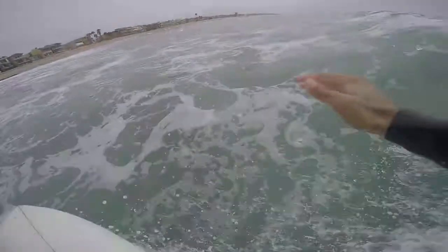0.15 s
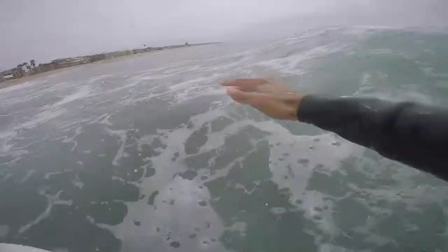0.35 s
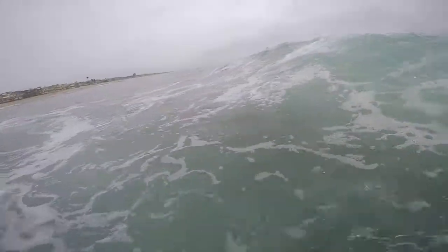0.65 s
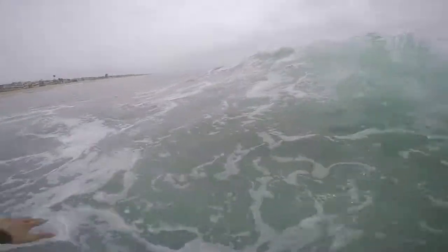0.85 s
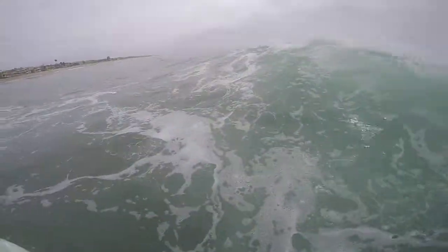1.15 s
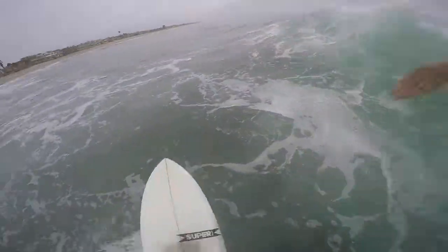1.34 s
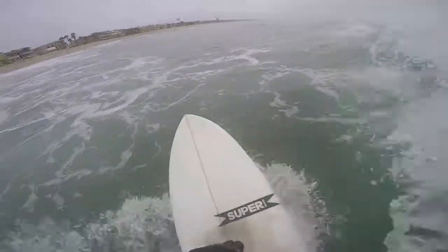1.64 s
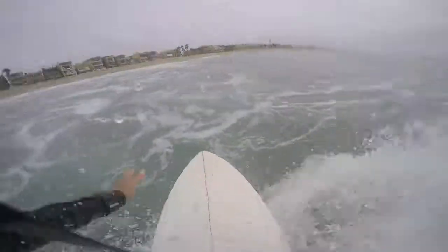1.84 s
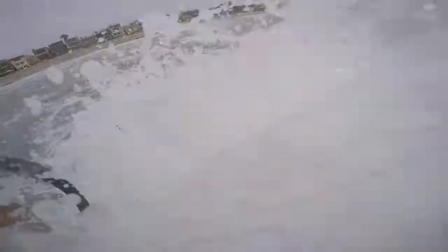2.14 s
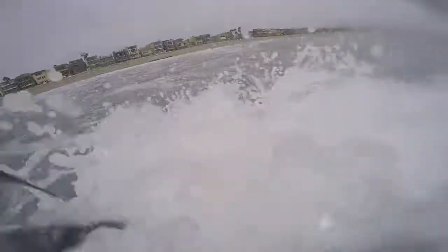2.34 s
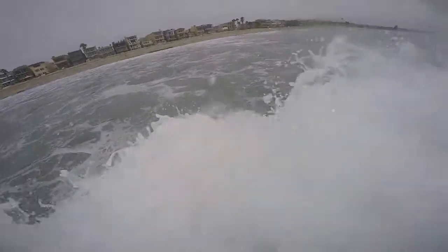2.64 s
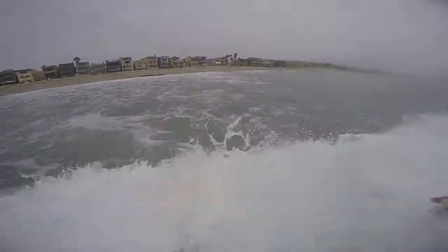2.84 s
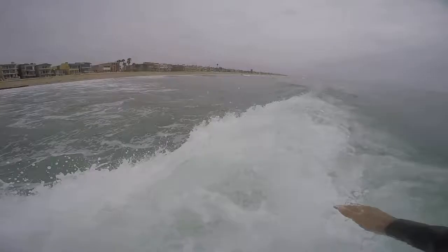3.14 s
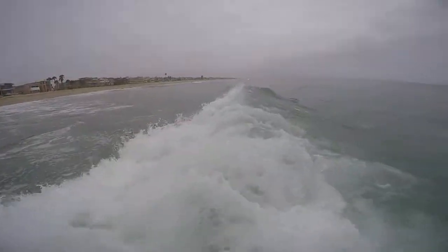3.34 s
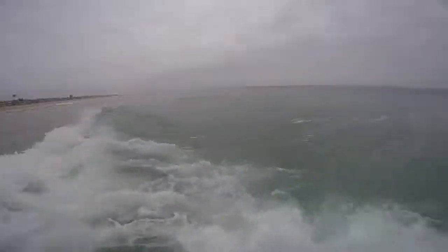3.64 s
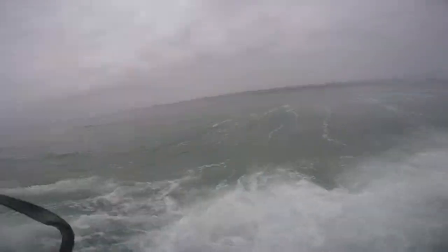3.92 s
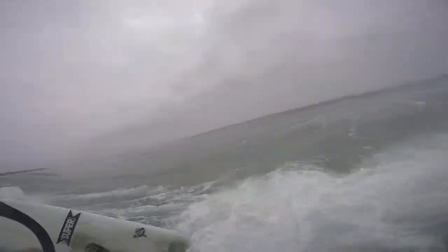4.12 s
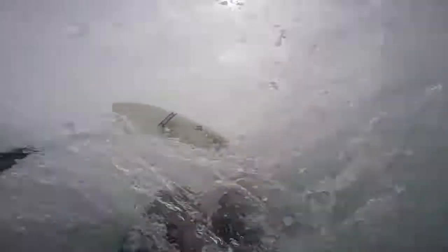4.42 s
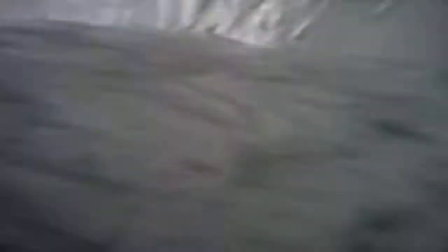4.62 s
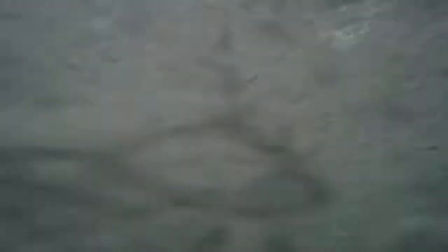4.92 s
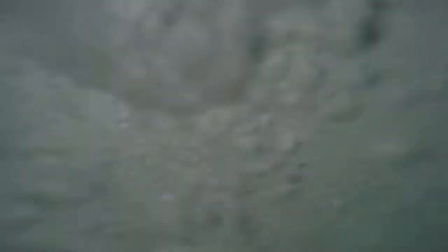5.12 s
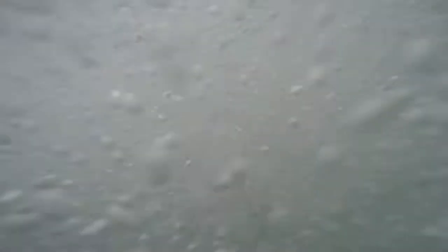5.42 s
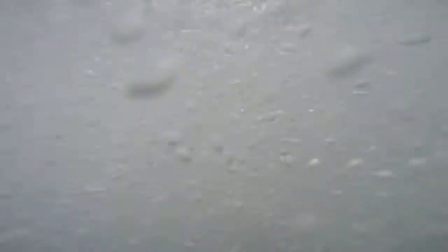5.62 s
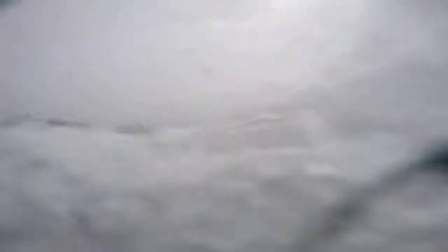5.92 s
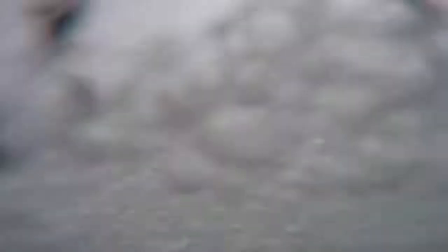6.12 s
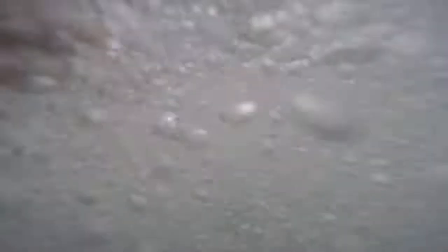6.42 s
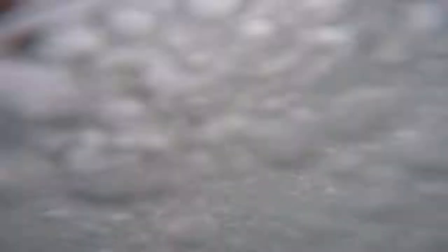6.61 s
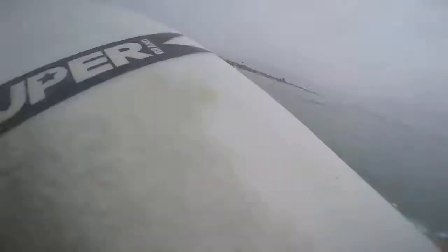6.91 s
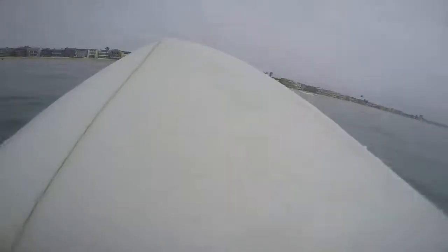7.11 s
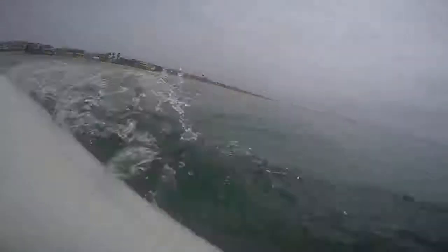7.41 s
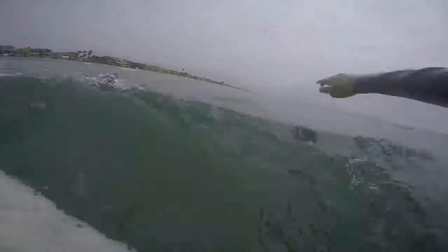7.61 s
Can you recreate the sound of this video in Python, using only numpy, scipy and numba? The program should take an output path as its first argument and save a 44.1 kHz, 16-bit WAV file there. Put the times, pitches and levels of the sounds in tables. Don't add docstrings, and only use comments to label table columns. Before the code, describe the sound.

A small enclosed microphone rides a breaking wave, gets slapped and dunked, gurgles through bubbles, pops back up with sharp knocks and trickling water.

```python
import sys
import numpy as np
from scipy import signal
from scipy.fft import rfft, irfft, next_fast_len
from scipy.io import wavfile
from scipy.ndimage import uniform_filter1d
from numba import njit

SR = 44100
rng = np.random.default_rng(int(sys.argv[2]) if len(sys.argv) > 2 else 0)


def natural_amplitude(level_db):
    exponent = np.asarray(level_db, float) / 20
    return 10 ** exponent


def unload_wav(signal):
    wavfile.write(
        sys.argv[1],
        SR,
        np.round(np.clip(np.atleast_2d(signal).T, -1, 1) * 32767).astype(np.int16),
    )


N = 342216


def unit(x):
    return x / np.sqrt(np.mean(x ** 2))


def colour(x, points):
    hz, db = np.transpose(points)
    size = next_fast_len(N)
    f = np.arange(size // 2 + 1) * SR / size + 1
    gain = natural_amplitude(np.interp(np.log(f), np.log(hz), db))
    return unit(irfft(rfft(x, size) * gain, size)[:N])


def resonate(x, hz, width):
    b, a = signal.iirpeak(min(hz, .45 * SR), hz / width, fs=SR)
    return signal.lfilter(b, a, x)


def walk(rate):
    hold = int(SR / rate)
    steps = np.repeat(rng.standard_normal(1000), hold)[:N]
    slewed = uniform_filter1d(uniform_filter1d(steps, hold), hold)
    return np.clip(1.3 * slewed, -2, 2)


def bell(t, s, width):
    return np.exp(-((t - s) / width) ** 2)


def add(out, at_s, sound):
    i = int(at_s * SR)
    out[i:i + len(sound)] += sound[:N - i]


@njit
def ring(start, hz, cycles, size, glide, count):
    out = np.zeros(count)
    for k in range(len(start)):
        length = cycles * SR / hz[k]
        phase = 0.
        for i in range(min(int(5 * length), count - start[k])):
            phase += 2 * np.pi * hz[k] / SR * (1 + glide * i / length)
            swell = 1 - np.exp(-phase / 4)
            out[start[k] + i] += size[k] * swell * np.exp(-i / length) * np.sin(phase)
    return out


def bubbles(count, usual_hz, octaves, cycles, glide, scatter_db):
    when, big, low, high = rng.random((count, 4)).T
    start = (when * N).astype(np.int64)
    hz = (usual_hz * np.ones(N))[start] * 2 ** (octaves * (low + high - 1))
    size = natural_amplitude(-scatter_db * np.log(1 - .98 * big))
    shower = ring(start, hz, float(cycles), size, float(glide), N)
    return shower / np.sqrt(uniform_filter1d(shower ** 2, size=11000) + 1e-9)


# (time [s], step [full scale], negative = sucked out)
FILM_FLIPS = [
    (1.468, .3),
    (1.498, -.4),
    (2.21, .35),
    (4.369, -.35),
    (6.834, -.45),
    (6.8515, .6),
    (4.66, -.25),
]
FLIP_S, SETTLE_S = .0025, .014


def flips(t):
    return sum(step * np.tanh((t - s) / FLIP_S) * bell(t, s, SETTLE_S) for s, step in FILM_FLIPS)


# (frequency [Hz], level per Hz [dB])
HEAVE_COLOUR = [(1.5, -19), (4, 12), (8, -6), (15, 6.5), (28, 5), (45, -11.5), (70, -20), (120, -77)]
# (time [s], level [dB])
SWELL_LEVEL = [(0.0, -32), (.7, -15.5), (1.15, -13), (1.3, -27), (2.0, -19), (2.35, -39.5), (3.33, -17),
               (3.7, -29), (4.2, -26.5), (4.55, -21), (4.84, -33.5), (5.32, -25), (5.88, -37.5),
               (6.42, -21), (6.8, -25.5), (7.3, -17), (7.76, -14.5)]
# (peak time [s], half width [s], level [dB])
HOUSING_JOLTS = [(0.05, 0.036, -30), (.24, 0.03, -26), (1.16, 0.027, -19), (1.48, 0.098, -21),
                 (1.69, 0.023, -21), (2.1, 0.068, -17.5), (2.214, 0.051, -13), (2.451, 0.037, -16.5),
                 (2.63, 0.099, -22), (2.811, 0.033, -21.5), (4.34, 0.051, -4.5), (4.47, 0.04, -15),
                 (4.7, 0.029, -15), (6.548, 0.028, -8), (6.847, 0.025, -6.5), (6.95, 0.055, -11.5),
                 (7.13, 0.12, -15), (7.52, 0.054, -21), (7.71, 0.022, -15)]
JOLT_HZ, JOLT_KNOCK_DB = 44.8, -11.5
OPENING_PUSH, OPENING_S = 0.15, 0.014


def heave(t):
    swing = colour(rng.standard_normal(N), HEAVE_COLOUR)
    power = uniform_filter1d(uniform_filter1d(swing ** 2, size=5000), size=5000)
    swing = swing / np.sqrt(power + .05)
    knock = unit(resonate(resonate(rng.standard_normal(N), JOLT_HZ, 36), JOLT_HZ, 36))
    jolts = sum(natural_amplitude(db) * bell(t, s, width) for s, width, db in HOUSING_JOLTS)
    swell = natural_amplitude(np.interp(t, *np.transpose(SWELL_LEVEL)))
    push = (swell + jolts) * swing + natural_amplitude(JOLT_KNOCK_DB) * jolts * knock
    push = push + OPENING_PUSH * bell(t, 0, OPENING_S) + flips(t)
    return .95 * np.tanh(push / .95)


# (start time [s], gap [s], level [dB], crack level [dB])
WHITE_WATER = [
    (2.065, 0.0018, -15, -22),
    (2.193, 0.0028, -18.5, -27),
    (4.652, .006, -11.5, -38),
]
LUMP_HZ, LUMP_OCTAVES, LUMP_SCATTER_DB = 1700, 0.76, -0.5


def lumps():
    rows = []
    for start, gap, db, crack_db in WHITE_WATER:
        scatter = np.clip(rng.standard_normal((12, 3)), -2, 2)
        for k, (late, size, tone) in enumerate(scatter):
            s = start + gap * (k + 0.33 * late)
            lift_db = LUMP_SCATTER_DB * size
            hz = LUMP_HZ * 2 ** (LUMP_OCTAVES * tone)
            rows.append((s, db + lift_db, hz, crack_db + lift_db))
    return rows


# (time [s], peak level [dB], ring [Hz], crack level [dB])
RIDING_BLOWS = [(0.447, -24, 1500, -50), (1.431, -10.5, 1170, -40), (1.4435, -17, 1230, -40),
                (1.4642, -6, 1210, -38), (1.803, -3.5, 1910, -18), (1.864, -9, 680, -31),
                (1.982, -2.5, 2860, -11.5), (2.001, -13, 1040, -22), (2.052, -18, 1760, -30),
                (2.066, -1.5, 3800, -6.5), (2.088, -8, 1760, -12), (2.091, 4, 2770, -6),
                (2.11, 4, 1760, -15), (2.132, -1.5, 2900, -10), (2.198, -2, 2510, -9),
                (2.209, -12.5, 870, -6.5), (2.217, -28, 647, -39), (2.23, -23, 1480, -40),
                (2.195, -3, 1810, -7), (2.305, -16, 2800, -51), (2.519, -9, 1990, -40),
                (2.595, -5, 2140, -41), (2.626, -20, 1700, -36), (2.639, -10, 2170, -40),
                (2.767, -15.5, 2120, -44), (2.799, -3.5, 1950, -39), (2.8005, -4, 1110, -41),
                (2.81, -7, 1240, -41), (2.881, -26, 1664, -28)]
# (time [s], peak level [dB], ring [Hz], crack level [dB])
TUMBLING_BLOWS = [(4.334, 10.5, 1207, -13), (4.373, -4, 1940, -36), (4.378, 1, 1980, -37),
                  (4.425, -6, 1790, -48), (4.437, -15.5, 1060, -49), (4.509, -17, 756, -58),
                  (4.523, -17, 1800, -56), (4.629, -16, 1730, -13), (4.641, -11, 1210, -31),
                  (4.658, -2, 1460, -30), (4.722, 3.5, 2070, -7), (4.797, -14, 2080, -25),
                  (4.876, -16, 1330, -50), (4.959, -12, 1290, -51), (5.184, -20, 2070, -55),
                  (5.323, -40, 2380, -64), (5.374, -13.5, 700, -57), (5.404, -13.5, 735, -62),
                  (5.47, -9.5, 527, -62), (5.538, -17.5, 830, -62), (5.565, -18, 1330, -62),
                  (5.682, -20.5, 3550, -55), (5.698, -11, 1420, -58), (5.727, -17, 1810, -51),
                  (5.802, -24, 1960, -46), (5.866, -14.5, 338, -62), (5.921, -27, 1000, -41),
                  (6.04, -22.5, 3500, -46)]
# (time [s], peak level [dB], ring [Hz], crack level [dB])
SURFACING_BLOWS = [(6.472, -11.5, 920, -26), (6.521, 4, 1855, -11), (6.5225, -11, 706, -40),
                   (6.527, -17, 2190, -42), (6.63, -16.5, 1970, -51), (6.649, -15.5, 890, -51),
                   (6.833, -1, 2250, -2.5), (6.846, 1, 930, -26), (6.8493, 0.5, 2830, -6),
                   (6.8535, -11, 980, -9), (6.914, -10, 596, -24), (6.945, -16.5, 830, -49),
                   (6.953, -14, 810, -40), (7.038, 4.5, 1600, -37), (7.0395, 0.5, 720, -45),
                   (7.199, -29, 940, -42), (7.32, -15, 2200, -48), (7.385, -18, 664, -47),
                   (7.414, -24, 713, -48), (7.437, -22, 850, -50), (7.471, -1, 1146, -51),
                   (7.566, -13.5, 1200, -54), (7.611, -22, 865, -26), (7.631, -14.5, 1070, -44),
                   (7.72, -18, 1100, -38)]
SLAP_MS, SLAP_SCATTER = 2.83, 0.26


def slaps():
    out, t = np.zeros(N), np.arange(int(.06 * SR)) / SR
    high = signal.butter(2, [3800, 13500], "band", fs=SR, output="sos")
    for s, db, hz, crack_db in list(RIDING_BLOWS) + list(TUMBLING_BLOWS) + list(SURFACING_BLOWS) + lumps():
        ms = SLAP_MS * 2 ** (SLAP_SCATTER * (2 * rng.random() - 1))
        shake, spit, drift = rng.standard_normal((3, len(t)))
        u = t / (np.clip(ms, .8, 12) / 3000)
        push = u ** 1.01 * np.exp(1 - u) / 2
        run_off = 0.064 * (1 - np.exp(-u)) * np.exp(-t / 0.0066)
        mode = np.sqrt(2) * np.sin(2 * np.pi * hz * t + 0.052 * np.cumsum(drift))
        neighbours = signal.butter(3, [0.37 * hz, min(1.75 * hz, 4400)], "band", fs=SR, output="sos")
        rattle = unit(signal.sosfilt(neighbours, shake))
        blow = natural_amplitude(db + 1.63) * (0.66 * push * mode + 0.46 * (push + 1.1 * run_off) * rattle)
        crack = natural_amplitude(crack_db + 2) * push ** 1.5 * signal.sosfilt(high, spit)
        thud = natural_amplitude(min(db, 0) - 18.0) * np.exp(-t / 0.0018) * np.sin(2 * np.pi * 300 * t)
        add(out, s - .0004, blow + crack + thud)
    return out


# (peak time [s], rise [s], fall [s], level [dB],
# brightness [dB], which lifts spray and lowers slosh)
THROWN_WATER = [(.45, 0.22, 0.16, -48.5, -4), (1.47, 0.21, 0.044, -40.5, 2.5),
                (1.76, 0.17, 0.06, -54.5, 25.5), (1.9, 0.12, 0.098, -28.5, 3.5),
                (2.1, 0.071, 0.093, -28, -1), (2.206, 0.0062, 0.014, -15.5, -0.5),
                (2.81, 0.046, 0.022, -47, -6), (3.35, 0.022, 0.062, -47, -3),
                (4.17, 0.038, 0.084, -40.5, 5), (4.31, 0.034, 0.042, -36.5, 5),
                (4.669, 0.028, 0.062, -14.5, 0), (5.47, 0.026, 0.053, -69, -18),
                (6.525, 0.025, 0.016, -32.5, -7), (6.855, 0.0026, 0.0065, -31.5, -21),
                (7.22, 0.032, 0.11, -65.5, -22), (7.4, 0.016, 0.027, -40.5, -8),
                (7.76, 0.028, .03, -59, -18)]


def surges(t, lean):
    gain = 0
    for s, rise, fall, db, bright_db in THROWN_WATER:
        gain = gain + natural_amplitude(db + lean * bright_db) * bell(t, s, np.where(t < s, rise, fall))
    return gain


# (frequency [Hz], width [Hz], level [dB])
HOUSING_MODES = [(780, 133, 2), (1760, 70, 11), (2685, 140, 5), (3994, 157, 3.5), (2340, 180, 1.5)]
FLICKER_DB = 2


def wash(share, bubble_hz, depth):
    t = np.arange(N) / SR
    foam = rng.standard_normal(N)
    hiss = np.zeros(N)
    for k, (hz, width, db) in enumerate(HOUSING_MODES):
        flicker = natural_amplitude(db + FLICKER_DB * walk(13))
        hiss += (-1) ** k * flicker * resonate(foam, hz, 2.0 * width)
    hiss = signal.sosfilt(signal.butter(4, 4600, fs=SR, output="sos"), hiss)
    stilled = depth * (np.abs(t - 6.2) > .6)
    hiss = hiss - .8 * stilled * resonate(hiss, 3920, 900)
    plops = bubbles(count=7000, usual_hz=bubble_hz, octaves=1.2, cycles=1.86, glide=.03, scatter_db=3.5)
    blips = bubbles(count=9000, usual_hz=1800, octaves=1.1, cycles=4.0, glide=0.05, scatter_db=6.5)
    swarm = unit(natural_amplitude(3.5 * walk(55)) * (plops + 1.37 * depth * blips))
    water = (1 - share) * unit(hiss) + np.sqrt(share * (2 - share)) * swarm
    return water - .9 * (1 - share) ** 2 * resonate(water, 1250, 500)


# (frequency [Hz], level per Hz [dB])
SLOSH_COLOUR = [(50, 3.5), (70, 8.5), (140, -7.5), (300, -5), (600, -8.5), (1000, -50)]


def slosh(share):
    rumble = natural_amplitude(4.5 * walk(25)) * colour(rng.standard_normal(N), SLOSH_COLOUR)
    glugs = bubbles(count=1200, usual_hz=188.7, octaves=1.6, cycles=2.22, glide=0.081, scatter_db=2.0)
    return np.sqrt(1 - share) * unit(rumble) + np.sqrt(share) * glugs


# (frequency [Hz], level per Hz [dB])
SPRAY_COLOUR = [(2590, -10.5), (4350, 0), (5100, 2), (6600, -4.5), (8000, -4.5), (9800, -10.5),
                (14600, -14), (15500, -18)]
CRACKLE = 1.7


def spray(share):
    fizz = natural_amplitude(1.8 * walk(14)) * rng.standard_normal(N)
    crackle = bubbles(count=2000, usual_hz=7500, octaves=0.97, cycles=3.5, glide=0, scatter_db=4.0)
    far = (1 - share) ** 1.98 * colour(fizz, SPRAY_COLOUR)
    near = share ** 2 * colour(crackle, [(3000, -6.0), (4500, 13.0), (15000, -13.0)])
    return far + CRACKLE * near


# (middle time [s], half width [s], bubble [Hz], level [dB])
BUBBLE_TRAINS = [(4.37, 0.021, 2030, -30.5), (2.213, 0.011, 154, -18), (6.526, 0.0026, 191, -5.5),
                 (5.101, 0.075, 201, -36.5), (5.24, 0.061, 154, -34), (5.42, 0.096, 684, -34.5),
                 (5.57, 0.058, 754, -41), (5.989, 0.052, 109, -36), (6.2, 0.14, 650, -44.5),
                 (6.44, 0.026, 695, -36), (6.56, 0.01, 676, -33), (7.18, 0.074, 984, -31),
                 (7.29, 0.064, 890, -40), (7.42, 0.024, 815, -34), (7.61, .05, 1040, -47)]


def gurgles(t):
    gains = np.array([natural_amplitude(db) * bell(t, s, width) for s, width, _, db in BUBBLE_TRAINS])
    hz = np.array(BUBBLE_TRAINS)[gains.argmax(axis=0), 2]
    stream = bubbles(count=6000, usual_hz=hz, octaves=0.53, cycles=2.2, glide=0.017, scatter_db=6.5)
    return gains.sum(axis=0) * stream


# (time [s], peak level [dB], pitch [Hz])
SHELL_DROPLETS = [(1.662, -24.5, 1830), (1.703, -20.5, 3740), (1.733, -24, 3960), (1.767, -26, 1900),
                  (1.826, -17, 2170), (1.827, -17, 900), (1.865, -11.5, 2620), (1.891, -18, 680),
                  (1.912, -14.5, 3560), (1.95, -21, 1000), (2.007, -20, 2110), (2.053, -14, 2700),
                  (2.076, -13, 2050), (2.103, -16, 7500), (2.146, -18, 2420), (2.152, -12, 2330),
                  (2.161, -17, 3330), (2.231, -11.5, 2880), (2.244, -19, 2720), (2.269, -20, 1670),
                  (2.288, -27, 1280), (2.406, -28, 2780), (2.519, -13, 3870), (2.542, -21, 2700),
                  (2.555, -22, 2500), (2.628, -21, 4200), (2.659, -18, 2400), (2.672, -24, 2580),
                  (2.694, -32, 2680), (2.707, -23, 2640), (2.731, -23, 2200), (2.769, -19.5, 1230),
                  (2.827, -23, 1890), (2.882, -22, 875), (2.916, -25, 2450), (2.934, -26, 2450),
                  (2.954, -22.5, 3400), (2.962, -23, 2500), (3.098, -21, 1640), (4.05, -37, 6000),
                  (4.14, -35, 3300), (4.335, 7, 2360), (4.349, -25, 1880), (4.363, -28, 2190),
                  (4.45, -28, 895), (4.461, -38, 1210), (4.473, -29, 1100), (4.57, -29.5, 3950),
                  (6.536, -21, 2750), (6.535, -20, 4260), (6.56, -28, 800), (6.713, -32, 4030),
                  (6.733, -25, 2210), (6.868, -32, 6360), (6.938, -41, 7500), (6.953, -14.5, 2500),
                  (6.954, -29, 5230), (7.068, -37, 4800), (7.115, -24, 2870), (7.232, -28, 2880)]
# (time [s], peak level [dB], pitch [Hz])
PORT_PINCHES = [(4.77, -14.5, 2550), (4.789, -22.5, 5300), (4.862, -32, 1450), (4.894, -27, 2870),
                (6.325, -29, 1350), (4.989, -41, 4860), (5.003, -18, 423), (5.026, -28, 4500),
                (5.071, -21, 600), (5.08, -14, 212), (5.093, -22, 2110), (5.1, -29, 4570),
                (5.12, -34, 1020), (5.147, -8.5, 135), (5.161, -34, 2960), (6.34, -29, 3020),
                (5.195, -9, 151), (5.204, -23, 2740), (5.23, -33, 740), (5.231, -35, 3940),
                (5.252, -6.5, 120), (5.282, -26, 552), (5.285, -30, 2640), (5.324, -22.5, 2220),
                (5.341, -29, 2370), (5.356, -19, 870), (5.374, -19.5, 1730), (5.382, -15.5, 734),
                (5.385, -24, 4640), (5.387, -22, 1910), (5.421, -19.5, 1880), (5.422, -35, 4540),
                (5.431, -31, 3520), (5.457, -26, 2750), (5.497, -27, 2100), (5.509, -32, 3400),
                (5.516, -29, 1400), (6.134, -31, 2250), (5.58, -15.5, 168), (5.595, -24, 620),
                (5.598, -28, 2320), (5.616, -19.5, 563), (5.638, -31, 4500), (5.638, -25, 1700),
                (5.673, -29, 2500), (6.131, -26, 720), (5.727, -32, 4820), (5.727, -38, 6360),
                (5.779, -28, 401), (5.827, -26, 2510), (5.827, -41, 4130), (5.888, -41, 5500),
                (5.899, -28.5, 1510), (5.951, -39, 4400), (5.97, -27, 2420), (5.9713, -28.5, 5750),
                (6.008, -30, 1960), (6.085, -36, 3520), (6.133, -28, 3300)]
# (time [s], peak level [dB], pitch [Hz])
RUN_OFF_TRICKLES = [(0.003, -44, 560), (7.091, -29, 1770), (7.113, -41, 894), (7.138, -30, 490),
                    (7.138, -37, 565), (7.155, -30, 729), (7.164, -23, 891), (7.179, -16.5, 460),
                    (7.199, -24, 1000), (7.224, -27, 961), (7.244, -30, 1070), (7.269, -28, 643),
                    (7.289, -24, 590), (7.304, -23, 820), (7.357, -35, 560), (7.394, -25, 1170),
                    (7.404, -28, 560), (7.424, -29, 848), (7.489, -23, 1720), (7.524, -31, 600),
                    (7.587, -20, 820), (7.631, -28, 1237), (7.659, -28, 537), (7.693, -41, 528),
                    (7.739, -32, 840)]
# (time [s], peak level [dB], pitch [Hz])
SHELL_OVERTONES = [(0.447, -21.5, 855), (0.447, -27, 2290), (0.4477, -32, 3200), (1.431, -31, 2400),
                   (1.465, -19, 1770), (1.465, -19, 590), (2.092, -5, 4630), (2.111, -19, 3300),
                   (2.199, -24, 4400), (2.213, -19, 5200), (4.656, 2, 160), (4.668, -6, 110),
                   (4.723, -4.5, 3040), (4.724, -4.5, 1460), (5.586, -9, 79.5), (6.522, -17, 3520),
                   (6.523, -14, 1180), (6.85, -4, 576), (6.832, -9, 1250), (6.833, -4.5, 3200),
                   (7.037, -2.5, 2650), (7.472, -20, 2350), (7.473, -18, 660), (7.567, -25, 2300),
                   (7.589, -25, 2370), (7.613, -22, 4020), (7.614, -25, 1900), (7.635, -26, 1890),
                   (7.72, -32, 2100)]
PLINK_CYCLES, PLINK_HZ, PLINK_GLIDE, PLINK_DB = 1.56, 1000, 0.0082, 5.5


def plinks():
    out = np.zeros(N)
    rings = list(SHELL_DROPLETS) + list(PORT_PINCHES) + list(RUN_OFF_TRICKLES) + list(SHELL_OVERTONES)
    for s, db, hz in rings:
        cycles = PLINK_CYCLES * (hz / PLINK_HZ) ** 0.59
        size = natural_amplitude([db + PLINK_DB])
        plink = ring(np.array([0]), np.array([float(hz)]), cycles, size, PLINK_GLIDE, 2000)
        add(out, s - .0005, plink)
    return out


# (time [s], peak level [dB], pitch [Hz])
MEMBRANE_TICKS = [(2.3515, -9.5, 12200), (2.629, 2.5, 7650), (4.3348, 5, 4470), (4.628, -7, 4980),
                  (4.6804, 13, 4960), (4.723, 12, 5850), (4.78, -4, 6400), (4.893, 6, 4700),
                  (5.0054, -6, 4530), (5.058, 3.5, 4770), (5.174, -14, 7900), (5.192, -17, 7110),
                  (5.239, -9, 6240), (5.383, -32, 6500), (5.474, -8.5, 5230), (5.5085, -25, 8650),
                  (5.612, -9, 6800), (5.6727, -12, 5930), (5.741, -2.5, 5950), (5.8073, -15, 12000),
                  (5.971, -6, 13300), (5.455, 2.5, 3330), (6.041, -12, 10900), (6.132, -9, 5800),
                  (6.447, -1, 6000), (6.478, -6, 14200), (6.7094, -13, 14700), (6.8327, 13.5, 6500),
                  (7.013, -5, 7850), (7.14, -5, 7660)]


def ticks():
    out, t = np.zeros(N), np.arange(int(.01 * SR)) / SR
    for s, db, hz in MEMBRANE_TICKS:
        burst = (t / 0.00091) ** 2 * np.exp(1 - t / 0.0003) * rng.standard_normal(len(t))
        tick = resonate(resonate(burst, hz, 0.28 * hz), hz, 0.28 * hz)
        add(out, s, natural_amplitude(db + 2.5) * tick)
    return out


# (time [s], pitch [Hz], level [dB])
AIR_POCKETS = [
    [(4.79, 135, -49), (4.806, 133, -30.5), (4.98, 139, -28), (5.05, 196, -37)],
    [(5.77, 105, -50), (5.79, 110, -26.5), (5.84, 105, -46)],
]


def pockets():
    out = np.zeros(N)
    for s, hz, db in map(np.transpose, AIR_POCKETS):
        t = np.arange(s[0], s[-1], 1 / SR)
        phase = 2 * np.pi * np.cumsum(np.interp(t, s, hz)) / SR
        level = np.sqrt(2) * natural_amplitude(np.interp(t, s, db))
        add(out, s[0], level * signal.windows.tukey(len(t), .3) * np.sin(phase))
    return out


WHINE_HZ, WHINE_DB = 11950, -76
DROPOUT_START_S, DROPOUT_END_S = 6.8735, 6.9150


def whine(t, depth):
    tone = resonate(resonate(rng.standard_normal(N), WHINE_HZ, 60), WHINE_HZ, 90)
    return (1 - depth * (t < DROPOUT_END_S)) * natural_amplitude(WHINE_DB) * unit(tone)


# (time [s], depth [0-1])
PORT_DEPTH = [
    (4.6, 0),
    (4.75, 0.58),
    (5.75, 0.97),
    (6.1, 0.99),
]
# (time [s], foam level [dB], wetness of the port [0-1])
SEA_STATE = [(0.0, -48.5, 0.12), (.4, -51, 0.13), (.75, -40, 0.22), (1.55, -40.5, 0.25), (2.3, -33, 0.37),
             (2.9, -34, 0.36), (3.72, -39, 0.3), (4.25, -45.5, 0.37), (4.56, -46, 0.26), (4.8, -32.5, 0.49),
             (5.34, -37.5, 1), (5.62, -40, 0.75), (6.07, -46, 0.35), (6.4, -38, 0.41), (7.04, -42.5, 0.41),
             (7.16, -39.5, 0.43), (7.33, -45.5, 0.35), (7.76, -39, 0.3)]
SPRAY_DB, SPRAY_LOSS_DB = 2, -38
SLOSH_DB, SLOSH_SUNK_DB = -3, 12
SURFACES_S, DRAINED_DB = 5.6, -10
DRY_BUBBLE_HZ, SOAKED_OCTAVES = 2250, -1.736
SURGE_SPRAY_DB = -4.5


def scene():
    t = np.arange(N) / SR
    s, foam_db, wet = np.transpose(SEA_STATE)
    foam_db, wet = np.interp(t, s, foam_db), np.clip(np.interp(t, s, wet), 0, 1)
    depth = np.clip(np.interp(t, *np.transpose(PORT_DEPTH)), 0, 1)
    slosh_db = foam_db + SLOSH_DB + SLOSH_SUNK_DB * depth ** 2 + DRAINED_DB * (t > SURFACES_S)
    low = (natural_amplitude(slosh_db) + surges(t, -1.34)) * slosh(wet)
    bubble_hz = DRY_BUBBLE_HZ * 2 ** (SOAKED_OCTAVES * wet)
    middle = (natural_amplitude(foam_db) + surges(t, 0)) * wash(wet, bubble_hz, depth)
    spray_db = foam_db + SPRAY_DB + SPRAY_LOSS_DB * wet ** 1.77
    high = (natural_amplitude(spray_db) + natural_amplitude(SURGE_SPRAY_DB) * surges(t, 1)) * spray(wet)
    surf = low + middle + high
    close = slaps() + gurgles(t) + plinks() + ticks() + pockets()
    return (heave(t) + surf + close + whine(t, depth))[None]


def band_limit(x):
    return signal.sosfilt(signal.butter(12, 16520, fs=SR, output="sos"), x)


TOP_HZ = 15350


def record(dry):
    t = np.arange(N) / SR
    before, after = (DROPOUT_START_S - t) / .002, (t - DROPOUT_END_S) / .0002
    alive = np.clip(np.maximum(before, after), 0, 1)
    shelf = signal.ellip(6, .3, 22, TOP_HZ, fs=SR, output="sos")
    mix = signal.sosfilt(shelf, np.clip(dry, -.95, .95) * alive)
    return band_limit(mix)


dry = scene()
out = record(dry)
unload_wav(out)
```